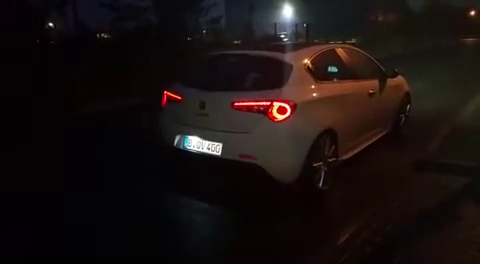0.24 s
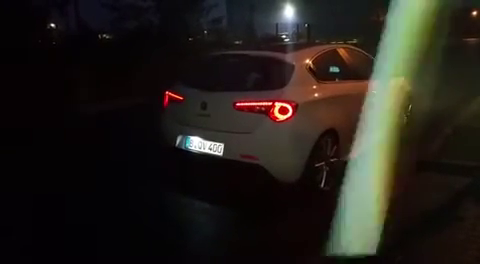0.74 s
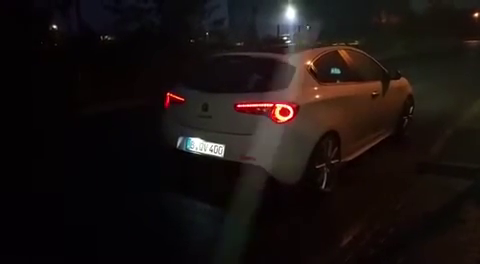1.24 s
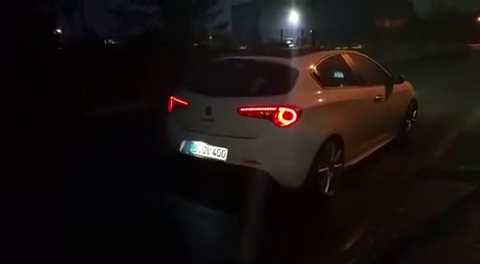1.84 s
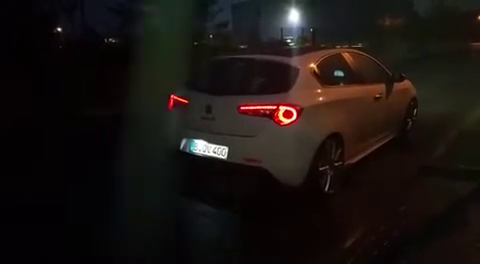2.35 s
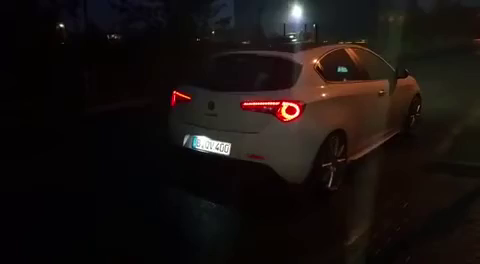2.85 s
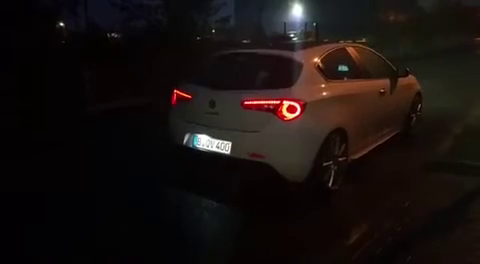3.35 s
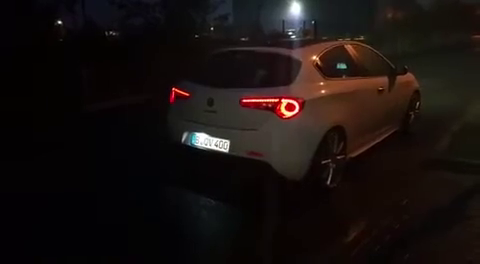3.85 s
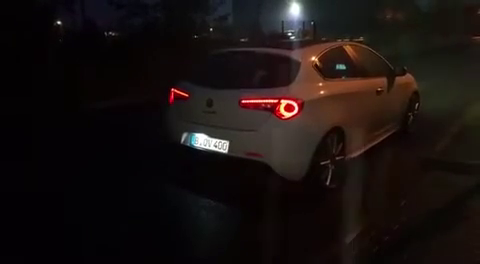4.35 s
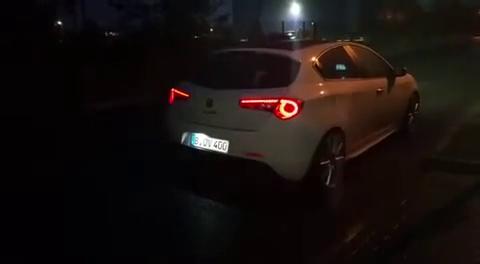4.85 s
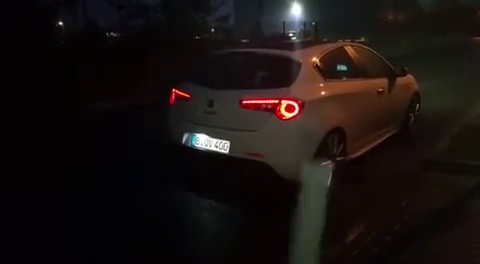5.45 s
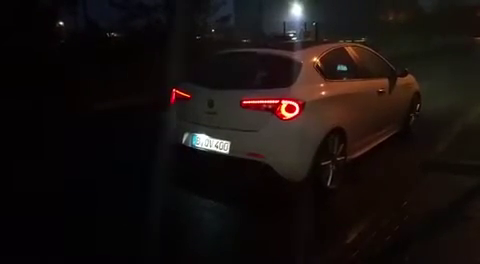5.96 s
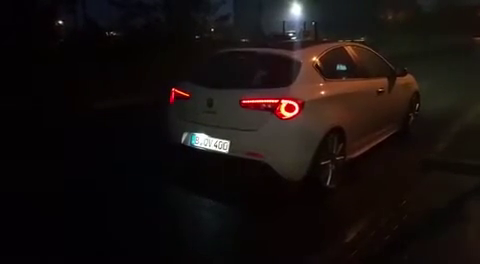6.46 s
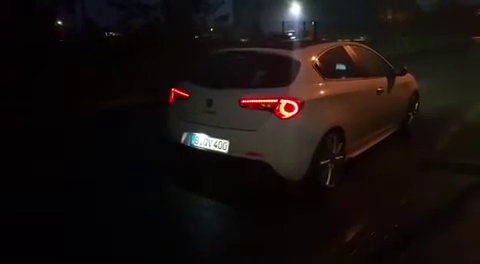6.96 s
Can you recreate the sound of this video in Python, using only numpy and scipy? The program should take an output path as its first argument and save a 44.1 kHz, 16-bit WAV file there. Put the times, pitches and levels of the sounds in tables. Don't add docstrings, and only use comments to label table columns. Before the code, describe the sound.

A parked four-cylinder turbo car heard close behind its exhaust on a quiet night street. Revs are already falling with small crackles, sink to a low burble, then surge to a hoarse roar. The throttle shuts: sharp pops, thumps and sputtering as it winds down. It sinks lower, then climbs in two steps and ends with one big bang. Short street echo, stereo.

```python
import sys
import numpy as np
from scipy import signal
from scipy.fft import rfft, irfft, next_fast_len
from scipy.io import wavfile
from scipy.ndimage import uniform_filter1d, map_coordinates

SR = 44100
rng = np.random.default_rng(int(sys.argv[2]) if len(sys.argv) > 2 else 0)


def transcribe(signal):
    frames = np.atleast_2d(signal).T
    limited = np.clip(frames, -1, 1)
    pcm = np.round(limited * 32767).astype(np.int16)
    wavfile.write(sys.argv[1], SR, pcm)


def undo_db(level):
    steps = np.asarray(level, float) / 20
    return 10 ** steps


N = 317961
TIME = np.arange(N) / SR

# (frequency [Hz], level [dB])
NIGHT_COLOUR = [(180, -71), (300, -6.5), (426, -4), (512, -5.5), (658, -1), (1350, -20.5), (1950, -19.5),
                (6390, -99), (16300, -75)]
# (frequency [Hz], time [s])
ECHO_T60 = [(200, 0.21), (1500, 0.28), (8000, 0.55), (16000, 0.031)]
# (frequency [Hz], level [dB])
ECHO_LEVEL = [(100, -40), (400, -17), (1500, -13.5), (8000, -9)]
# (frequency [Hz], level [dB])
SPREAD_LEVEL = [(60, -44.5), (250, -82), (600, -63), (1290, 2), (2400, -4.5), (4400, -1.5), (8100, -3),
                (14000, 0.5)]
# (frequency [Hz], phase [radians])
SPREAD_PHASE = [(500, 0.26), (1200, 1.64), (2000, 1), (4000, 1.85), (8000, 0.93), (10500, 0.73),
                (13000, 9.3)]

# (time [s], firing rate [Hz])
FIRING_RATE = [(0, 89.56), (.96, 57.5), (1.72, 43.3), (1.83, 46.51), (1.99, 67.6), (2.41, 133.9),
               (2.59, 130.8), (3.95, 70.36), (4.7, 49.55), (5.56, 35.6), (5.68, 46.64), (5.86, 74.86),
               (6.0, 84.1), (6.28, 85.25), (6.45, 106.6), (6.61, 136.2), (6.93, 128), (7.09, 136.2)]
# (time [s], level [dB])
BURN_STRENGTH = [(0, -15), (.75, -33), (1.44, -17.5), (1.74, -22.5), (1.88, -8.5), (2.38, -5), (2.6, -17.5),
                 (2.75, -26), (3.45, -22), (4.0, -27.5), (4.7, -18), (5.4, -23.5), (5.68, -9), (6.61, -7),
                 (6.83, -14), (6.93, -27), (7.02, -15.5), (7.21, -31.5)]
# (time [s], level [dB])
AIR_FLOW = [(0, -66), (.75, -86), (1.42, -69), (1.87, -62), (2.2, -46), (2.55, -47.5), (2.81, -69),
            (3.97, -76.5), (4.72, -66.5), (5.38, -71.5), (5.62, -64), (5.96, -44.5), (6.12, -53.5),
            (6.36, -53.5), (6.53, -43.5), (6.93, -56.5), (7.09, -55.5), (7.21, -70)]
# (start [s], end [s], added unevenness [0-1])
THROTTLE_SHUT = [
    (0, 1.0, .65),
    (2.43, 4.42, 0.69),
    (6.14, 6.29, 0.24),
    (6.64, 6.86, 0.31),
    (6.86, 6.96, 0.6),
]
# (start [s], length [s], afterburn [dB], venting [dB])
PEDAL_LIFTS = [
    (0, 0.071, 7.5, 5),
    (2.421, 0.31, 7, 11.5),
    (6.039, 0.32, 7.5, 2),
    (6.618, 0.34, 2.5, 10.5),
]
# (time [s], half width [s], level [dB])
FUEL_CUTS = [
    (2.433, 0.013, -4.5),
    (2.614, 0.025, -43),
    (6.2, 0.1, -2),
    (6.239, 0.046, -3.5),
    (6.652, 0.017, -4),
    (6.835, 0.0041, -11),
    (6.943, 0.023, -8),
    (7.19, 0.17, -2.5),
]
EVEN, SETTLE_S = 0.19, 0.049

# (frequency [Hz], width [Hz], level [dB])
PIPE_RINGS = [(149.4, 62.6, 1.5), (247.8, 65, 0), (412.9, 62.5, 1.52), (479, 133, -0.5), (613.5, 121, -2),
              (809, 69, -9), (325, 59, -4.5), (1148, 91, -5)]
# (frequency [Hz], width [Hz], level [dB])
MUFFLER_RINGS = [(51.6, 18.5, 3), (80.8, 44, 0.5), (150, 27, -3.5)]
# (frequency [Hz], width [Hz], level [dB])
STANDING_WAVES = [(52.8, 45, -0.5), (99.8, 43.3, 1.5), (152, 40.2, 0), (248.4, 43, -4), (406, 47, -3.5)]
# (firing rate [Hz], level [dB])
RASP_OFF_PEDAL = [(36, -10.5), (46, -4), (54, 5.5), (75, 1.5), (130, -2.5)]
# (firing rate [Hz], level [dB])
RASP_ON_PEDAL = [(45, 4.5), (66, -2), (84, 3), (105, 0.5), (135, 0)]
UNEVEN_STEP_DB = -16.5
LUG_HZ, LUG_DB = 62, 5
SMEAR_HZ, SMEAR_RADIANS = 63.6, 0.96
RASP_DB, RASP_AIR, RASP_BURN = -29, 0.56, 0.19
RASP_LIFT_DB = -5
BURBLE_DB, BURBLE_BURN = -28, 0.073

# (frequency [Hz], level [dB])
JET_COLOUR = [(530, -8), (900, 4), (1120, 6.5), (1180, -5), (1350, -1), (1480, -4), (1680, 3.5),
              (2220, -4.5), (2550, -1.5), (3200, -21), (4160, -46), (7040, -120)]
# (frequency [Hz], level [dB])
BOOST_COLOUR = [(1880, -55), (3200, -7.5), (3850, -5.5), (5530, -4.5), (6630, -10), (7740, -8), (8410, -11),
                (11000, -24), (14300, -53), (22000, -120)]
# (frequency [Hz], level [dB])
COAST_COLOUR = [(1650, -7), (2800, -2.5), (3880, 2), (4660, -8.5), (5930, -11), (6960, -9.5), (11000, -18),
                (14300, -5), (22000, -120)]
# (frequency [Hz], level [dB])
TICK_COLOUR = [(5290, -43), (9000, -4.5), (12000, 4.5), (13600, 7.5), (15100, -2), (15800, 7), (16100, -43)]
JET_DB, JET_AIR = -42, 1.016
HISS_LIFT_DB = -3
TICK_DB, TICK_AIR, TICK_SHUT_DB = -51, 0.53, -7.5
TICK_OCTAVE_DB = -4.5

# (time [s], peak [dB], bright crack [dB], hollow body [dB])
PIPE_POPS = [(.002, -37, 2, 20), (0.073, -35, -1.5, 5), (0.164, -30, -20, 4), (.207, -34, -12, 7.5),
             (.266, -36, -11, 3), (0.304, -36.5, -14, -2), (.347, -38, -13, 12), (2.561, -51, -17, 4),
             (2.591, -14.5, -12, 0.5), (2.627, -8.5, -3, -2), (2.668, -27.5, 7.5, 6.5),
             (2.742, -25.5, -11, 1.5), (2.856, -41.5, -2, 13), (2.981, -16, -17, -3.5), (3.035, -38, -3, 2),
             (3.093, -15.5, -11, -1), (3.152, -35, -22, 2), (3.21, -26.5, -7, 1.5), (3.261, -29, -10, 1.5),
             (3.366, -30.5, -6, 7.5), (3.398, -32, -4.5, 7), (3.476, -33.5, -11, 15.5), (3.509, -35, -4, 8),
             (3.569, -29, -17, 3.5), (3.596, -36.5, -12, 11.5), (4.193, -37, -19, 4), (5.552, -57, 7, 16),
             (6.841, 5, -12.5, -9.5), (6.86, -24, -18, 0.5), (6.884, -29, 3, 1)]
# (start [s], end [s], peak [dB], hollow body [dB])
SPUTTER_RUNS = [
    (.02, .25, -40, 9),
    (2.679, 3.62, -47.5, 9),
    (3.721, 3.92, -50.5, 17.5),
]
# (time [s], peak [dB])
MISFIRES = [(0.351, -16), (.899, -19), (2.42, -4.5), (2.559, 0.5), (2.59, -16), (2.627, -9), (2.857, -13),
            (2.979, -18.5), (3.091, -14.5), (3.48, -9), (3.562, -17.5), (4.138, -10), (4.257, -12.5),
            (4.368, -8), (4.418, -7.5), (4.768, -5), (5.539, -13), (6.149, -12), (6.637, -5), (6.841, -1.5),
            (7.118, -20)]
# (frequency [Hz], level [dB])
BANG_COLOUR = [(470, 10.5), (800, 3), (1160, 12), (1530, -4.5), (1790, 8.5), (2450, -17.5), (2760, -6.5),
               (4000, -51), (5200, -74), (8800, -120)]
# (frequency [Hz], level [dB])
CRACK_COLOUR = [(2350, 0), (4000, -6.5), (4630, -2.5), (5090, -4.5), (10200, -12), (15200, -4),
                (16300, -8.5)]
POP_T60_S = 0.043
SPUTTER_GAP_S, SPUTTER_SPREAD_DB, SPUTTER_CRACK_DB = 0.026, 2, -14
THUMP_HZ, THUMP_FOLLOWS, THUMP_T60_S = 46.2, 0.38, 0.078

# (time [s], peak [dB])
WHEEL_SLOWS = [
    (1.0, -66.5),
    (4.38, -67),
]
WHISTLE_HZ, SAG_HZ_PER_S, SWELL_S, SWELL_DB = 6370, 1600, 0.62, 16


def unit(x):
    return x / np.sqrt(np.mean(x ** 2) + 1e-20)


def along(points, hz):
    f, v = np.transpose(points)
    return np.interp(np.log(hz + 1), np.log(f + 1), v)


def curve(rows):
    return np.interp(TIME, *np.transpose(rows))


def spans(rows, edge_s):
    flat = sum(h * ((TIME >= a) & (TIME < b)) for a, b, h in rows)
    return uniform_filter1d(flat, max(round(edge_s * SR), 1))


def wobble(rate):
    return map_coordinates(rng.standard_normal(int(N * rate / SR) + 4), [TIME * rate])


def filtered(x, response):
    n = x.shape[-1]
    m = next_fast_len(n + 8192)
    return irfft(rfft(x, m) * response(np.fft.rfftfreq(m, 1 / SR)), m)[..., :n]


def coloured(x, colour):
    return unit(filtered(x, lambda f: undo_db(along(colour, f))))


def noise(colour, size=N):
    return coloured(rng.standard_normal(size), colour)


def resonances(modes):
    def response(f):
        total = 0
        for k, (centre, width, db) in enumerate(modes):
            ring = 1j * f * width / (centre * centre - f * f + 1j * f * width)
            total = total + (-1) ** k * undo_db(db) * ring
        return total
    return response


def steady(x, seconds):
    return x / np.sqrt(np.abs(uniform_filter1d(x ** 2, round(seconds * SR))) + 1e-12)


def night():
    return undo_db(-47.5) * noise(NIGHT_COLOUR)


def street(x):
    hz, t, z = signal.stft(rng.standard_normal((2, SR // 2)), SR, nperseg=256)
    dying = undo_db(-60 * t / along(ECHO_T60, hz)[:, None])
    tail = signal.istft(z * dying, SR, nperseg=256)[1]
    tail = tail / np.linalg.norm(tail[0])
    late = np.pad(x, (300, 0))
    wet = signal.fftconvolve(late[None], tail, axes=1)[:, :N]
    return filtered(wet, lambda f: undo_db(along(ECHO_LEVEL, f)))


def turbo():
    start, peak_db = np.transpose(WHEEL_SLOWS)
    near = np.argmin(np.abs(TIME - start[:, None] - SWELL_S / 2), axis=0)
    age = TIME - start[near]
    db = peak_db[near] - SWELL_DB * np.minimum((2 * age / SWELL_S - 1) ** 2, 4)
    hz = WHISTLE_HZ - SAG_HZ_PER_S * age + 260 * wobble(610)
    return undo_db(db + 4.6 * wobble(77)) * np.sin(2 * np.pi * np.cumsum(hz) / SR)


def sputter():
    rows = []
    for start, end, db, body_db in SPUTTER_RUNS:
        times = start + SPUTTER_GAP_S * (np.arange(40) + rng.random(40))
        sizes_db = db + SPUTTER_SPREAD_DB * rng.standard_normal(40)
        rows += [(s, size, SPUTTER_CRACK_DB, body_db) for s, size in zip(times, sizes_db) if s < end]
    return rows


def pops(rows):
    out, t = np.zeros(N + SR), np.arange(SR // 8) / SR
    body = [(120, -27), (170, -14.5), (300, -10.5), (350, -8.0), (440, 6.0), (550, -18.5),
            (650, 1.5), (900, -55.0), (1500, -63)]

    def fall(k):
        return undo_db(-60 * t / (k * POP_T60_S)) * (1 - np.exp(-t / 0.00013))

    for s, db, crack_db, body_db in rows:
        pop = noise(BANG_COLOUR, len(t)) * fall(0.79)
        pop += undo_db(crack_db) * noise(CRACK_COLOUR, len(t)) * fall(0.7)
        pop += undo_db(body_db) * noise(body, len(t)) * fall(2.09)
        out[round(s * SR):][:len(t)] += undo_db(db + 1.66) * pop
    return out[:N]


def thumps():
    out, t = np.zeros(N + SR), np.arange(SR // 5) / SR
    for s, db in MISFIRES:
        hz = THUMP_HZ + THUMP_FOLLOWS * np.interp(s, *np.transpose(FIRING_RATE))
        push = -np.sin(2 * np.pi * hz * t) * undo_db(-60 * t / THUMP_T60_S) * (1 - np.exp(-t / 0.0017))
        out[round(s * SR):][:len(t)] += undo_db(db + 3.0) * push
    return out[:N]


def levels(rate_hz, uneven):
    burn, air = curve(BURN_STRENGTH), curve(AIR_FLOW)
    after = spans([(s, s + length, db) for s, length, db, _ in PEDAL_LIFTS], 0.057)
    vent = spans([(s, s + length, db) for s, length, _, db in PEDAL_LIFTS], 0.12)
    lifting = spans([(s, s + length, 1) for s, length, _, _ in PEDAL_LIFTS[1:]], 0.051)
    idling = np.clip(-(burn + 11) / 7, 0, 1)
    orders = []
    for k in (1, 2, 3):
        standing_db = 40 * np.log10(np.abs(resonances(STANDING_WAVES)(k * rate_hz)))
        orders.append(burn + standing_db + (k - 1) * UNEVEN_STEP_DB * uneven)
    orders[1] += LUG_DB * (1 - idling) * np.clip((LUG_HZ - rate_hz) / 12, 0, 1)
    rasp = RASP_DB + RASP_AIR * (air + 60) + RASP_BURN * (burn + 20) + RASP_LIFT_DB * lifting
    rasp += (1 - idling) * along(RASP_ON_PEDAL, rate_hz) + idling * along(RASP_OFF_PEDAL, rate_hz)
    burble = BURBLE_DB + BURBLE_BURN * (burn + 20) + after
    jet = JET_DB + JET_AIR * (air + 60) + HISS_LIFT_DB * lifting
    boost = air + HISS_LIFT_DB * lifting
    tick = TICK_DB + TICK_AIR * (air + 60) + TICK_SHUT_DB * uneven + vent
    tick += TICK_OCTAVE_DB * idling * np.log2(rate_hz / 70)
    return orders, rasp, burble, jet, boost, tick


def flow():
    return undo_db(sum(db * np.exp(-((TIME - s) / width) ** 4) for s, width, db in FUEL_CUTS))


def by_firing(firing):
    return rng.standard_normal(firing[-1] + 2)[firing]


def valve_ticks(turns, firing):
    strength = undo_db(3 * by_firing(firing) + 8 * (firing % 2))
    snap = uniform_filter1d(np.exp(-4.5 * (turns % 1)) * strength, size=90)
    hiss = noise(TICK_COLOUR)
    bright = filtered(snap * hiss, lambda f: 1 / (1 + (14300 / (f + 1)) ** 30))
    return unit((0.3 + 0.12 * snap) * hiss + 1.3 * bright)


def tailpipe_gas(gate, size, load):
    def puffs(colour, smooth):
        return coloured((smooth + gate ** 1.6 * size) * rng.standard_normal(N), colour)

    jet = puffs(JET_COLOUR, 0.5 - 0.28 * load) * undo_db(1.5 * wobble(12))
    hiss = np.sqrt(load) * puffs(BOOST_COLOUR, 0.28) + np.sqrt(1 - load) * puffs(COAST_COLOUR, 0.8)
    return jet, hiss * undo_db(wobble(15))


def muffler_burble(firing, uneven):
    stray = (np.diff(firing, prepend=0) > 0) * by_firing(firing) * undo_db(0.45 * wobble(7.7))
    boom = filtered(stray, lambda f: resonances(MUFFLER_RINGS)(f) / (1 + (f / 220) ** 4))
    return (0.74 + 0.33 * uneven) * steady(boom, 0.31)


def pipe_rasp(turns, rate_hz, uneven, gate, size, load):
    def pipe(f):
        return resonances(PIPE_RINGS)(f) ** 2

    def edges(f):
        return (1j * f / (200 + 1j * f)) ** 2 / (1 + (f / 1400) ** 4)

    drift = [undo_db(3 * wobble(14)) for _ in range(3)]
    steps_hz = np.arange(10000) / 4
    ladder = pipe(steps_hz) / (1 + (steps_hz / 560) ** 6)
    upper = np.zeros(N)
    for k in range(4, 17):
        ringing = ladder[(4 * k * rate_hz).astype(int)]
        upper += drift[k % 3] * np.real(ringing * np.exp(2j * np.pi * k * turns))
    turbulence = (0.38 + gate) * size * rng.standard_normal(N)
    swirl = steady(filtered(turbulence, lambda f: pipe(f) * edges(f)), 0.93)
    rasp = np.sqrt(1 - 0.95 * uneven) * steady(upper, 0.05) * size + np.sqrt(0.08 + 1.3 * uneven) * swirl
    dull = steady(filtered(rasp, lambda f: 0.3 + 1 / (1 + (f / 330) ** 6)), 0.074)
    return load * rasp + (1 - load) * dull


def low_orders(turns, rate_hz, orders_db):
    smear = SMEAR_RADIANS * np.clip((SMEAR_HZ - rate_hz) / 12, 0, 1)
    total = np.zeros(N)
    for k, db in enumerate(orders_db, 1):
        phase = 2 * np.pi * k * turns - 0.99 * (k - 1) - smear * (k - 1) ** 2
        total += undo_db(db) * np.sqrt(2) * np.cos(phase)
    return total


def engine():
    rate_hz = curve(FIRING_RATE)
    uneven = np.clip(EVEN + spans(THROTTLE_SHUT, SETTLE_S), 0, 1)
    orders_db, rasp_db, burble_db, jet_db, boost_db, tick_db = levels(rate_hz, uneven)
    turns = np.cumsum(rate_hz) / SR
    firing = turns.astype(int)
    cylinder_db = np.array([-0.14, -0.69, -0.94, -1.4])[firing % 4]
    size = uniform_filter1d(undo_db(cylinder_db + 4.3 * uneven * by_firing(firing)), size=300)
    gate = uniform_filter1d(np.exp(-2.5 * (turns % 1)), size=40)
    load = np.clip((boost_db + 65.5) / 11, 0, 1)
    jet, hiss = tailpipe_gas(gate, size, load)
    out = low_orders(turns, rate_hz, orders_db) * size
    out += undo_db(burble_db) * muffler_burble(firing, uneven)
    out += undo_db(rasp_db) * pipe_rasp(turns, rate_hz, uneven, gate, size, load)
    out += undo_db(jet_db) * jet + undo_db(boost_db + 7.5) * hiss
    out += undo_db(tick_db) * valve_ticks(turns, firing)
    return flow() * out


def road_notch(f):
    dips = 0.66 * np.exp(-((f - 1400) / 90) ** 2) + 0.29 * np.exp(-((f - 3300) / 150) ** 2)
    return 1 - dips - 0.5 * np.exp(-((f - 6900) / 250) ** 2)


def scene():
    car = night() + turbo() + pops(sputter()) + pops(PIPE_POPS) + thumps() + engine()
    z = signal.stft(np.pad(car, (128, 0)), nperseg=256)[2]
    scattered = signal.istft(z * np.exp(2j * np.pi * rng.random(z.shape)), nperseg=256)[1][:N]
    direct = filtered(car, lambda f: undo_db(along(SPREAD_LEVEL, f)) * np.exp(1j * along(SPREAD_PHASE, f)))
    side = 0.7 * direct + 1.05 * filtered(scattered, lambda f: undo_db(along(SPREAD_LEVEL, f)))
    mid = filtered(car, road_notch)
    return np.array([mid + side, mid - side]) + street(mid)


def low_pass(x):
    return signal.sosfilt(signal.butter(12, 16430, fs=SR, output="sos"), x)


def record(dry):
    clipped = dry / (1 + np.abs(dry) ** 8) ** (1 / 8)
    mix = filtered(clipped, lambda f: f < 16250)
    return low_pass(mix)


dry = scene()
out = record(dry)
transcribe(out)
```